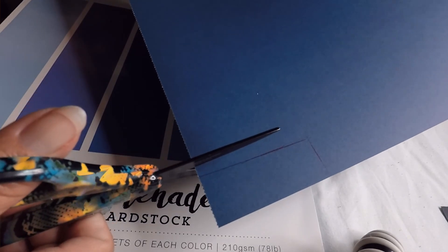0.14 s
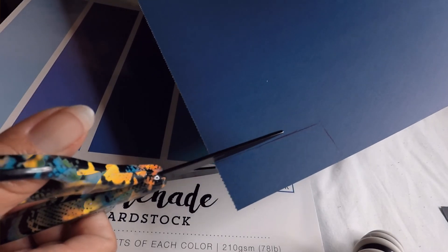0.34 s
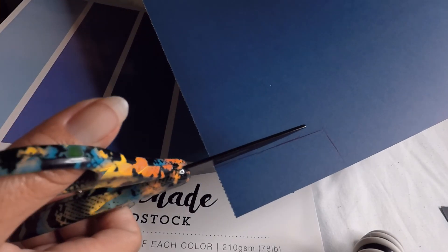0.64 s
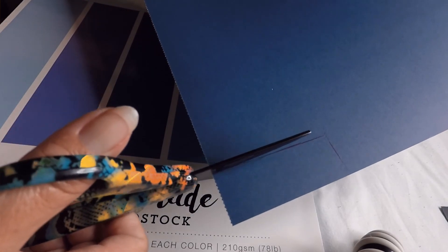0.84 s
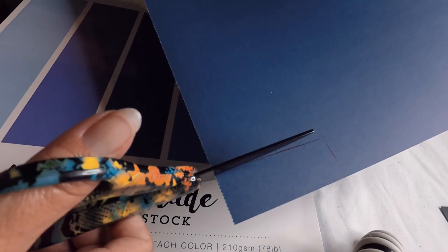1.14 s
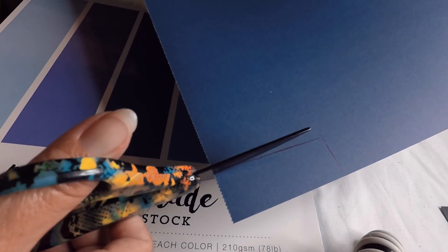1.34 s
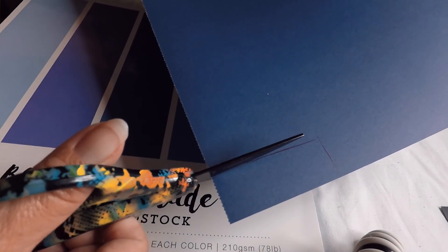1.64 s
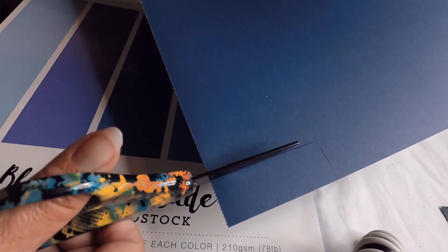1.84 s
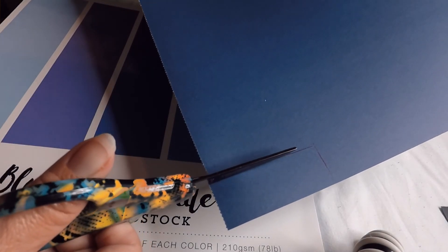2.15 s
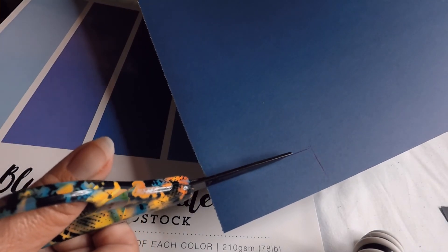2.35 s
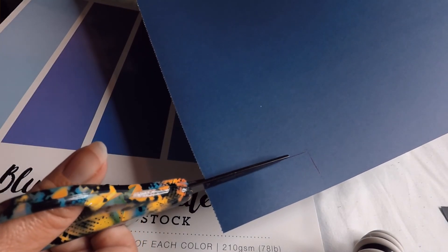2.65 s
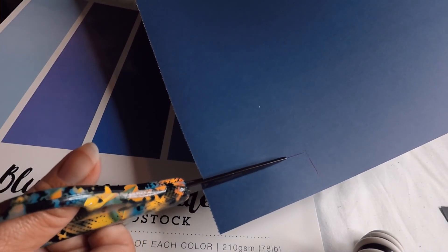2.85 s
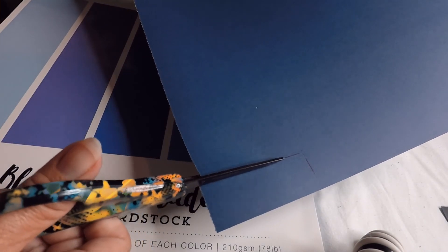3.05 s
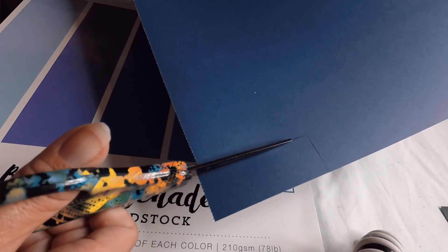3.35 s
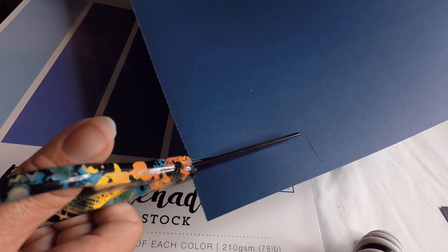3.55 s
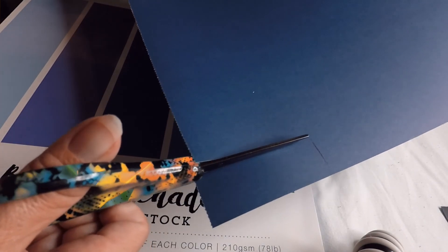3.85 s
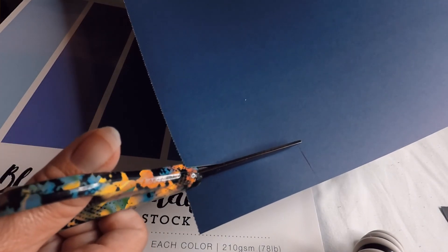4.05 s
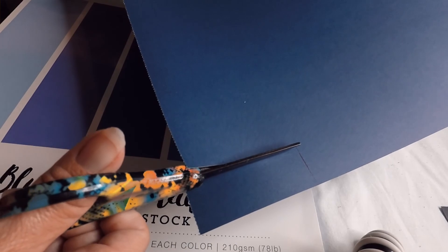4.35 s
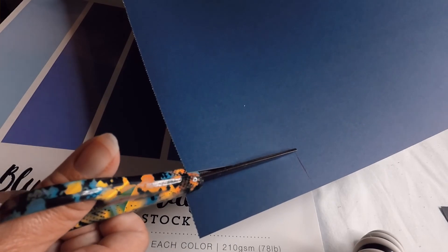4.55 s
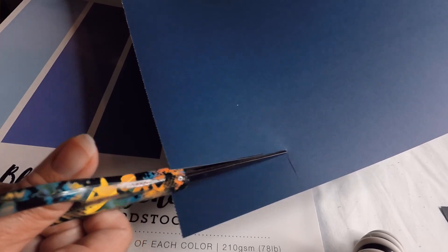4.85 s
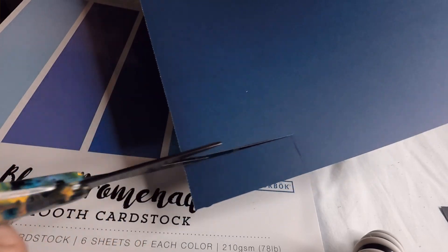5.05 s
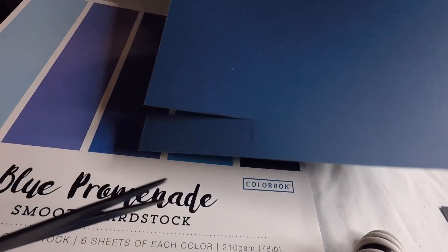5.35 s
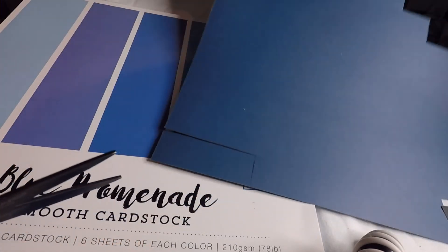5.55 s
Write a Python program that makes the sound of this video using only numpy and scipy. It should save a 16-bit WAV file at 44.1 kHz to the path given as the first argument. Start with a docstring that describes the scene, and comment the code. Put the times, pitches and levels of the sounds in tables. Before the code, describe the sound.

Scissors crunch slowly through thick card, snapping twice, before the blades pull out and the sheet slides across a table.

```python
"""At a table in a small room, scissors work slowly through thick card, close up.
Fibres give way in crackling slips that ring the sheet; two strokes end in a snap. In between, the
blades slide in the slit, scrape and knock the card; then they are drawn out and the sheet is pulled
across the table. The handled sheet bumps and rumbles over faint room hiss."""
import sys
import numpy as np
from scipy import signal
from scipy.fft import rfft, irfft
from scipy.io import wavfile

SR = 44100
rng = np.random.default_rng(int(sys.argv[2]) if len(sys.argv) > 2 else 0)


def log_audio(samples):
    """Write samples as a 16-bit WAV file to the path given in sys.argv[1]."""
    # one column per channel
    frames = np.atleast_2d(samples).T
    # limit to full scale, then quantise
    limited = np.clip(frames, -1, 1)
    pcm = np.round(limited * 32767).astype(np.int16)
    wavfile.write(sys.argv[1], SR, pcm)


N = 251525
TIME_S = np.arange(N) / SR

# big slips of the cut: (time [s], length [s], level [dB])
BIG_SLIPS = [(1.372, 0.011, -45.5), (1.431, .011, -40), (1.505, 0.011, -38.5), (1.725, 0.028, -40.5),
             (1.802, 0.021, -38), (1.983, 0.01, -40), (2.027, 0.022, -37.5), (2.258, 0.0052, -37.5),
             (2.38, 0.0048, -35), (2.422, 0.017, -36), (2.45, 0.0095, -33), (2.476, 0.0075, -33.5),
             (2.529, 0.0066, -37.5), (2.569, 0.0083, -36), (2.681, 0.0035, -34.5), (2.709, 0.013, -28.5),
             (2.765, 0.017, -35), (2.797, 0.0098, -27), (2.813, 0.025, -30.5), (2.95, 0.0037, -35),
             (2.958, 0.0057, -32), (3.098, 0.019, -33), (3.128, 0.005, -24), (3.322, 0.019, -28.5),
             (4.482, 0.0088, -32), (4.509, 0.0242, -29.5), (4.539, 0.013, -28), (4.571, 0.013, -24.5),
             (4.589, 0.011, -26.5), (4.611, 0.01, -32.5), (4.642, 0.0092, -27), (4.665, 0.012, -26),
             (4.687, 0.024, -28), (4.941, 0.014, -31.5)]
# hand squeezes: (time [s], length [s], first level [dB], last level [dB], slips [1/s], treble [dB])
SQUEEZES = [(1.368, 0.32, -46.5, -42, 42, -18.5), (1.726, 0.22, -37, -42.5, 45, -17.5),
            (2.007, 0.083, -39.5, -37.5, 50.6, -15.5), (2.11, .22, -47, -43.5, 30, -14),
            (2.415, 0.147, -40, -42, 36, -15.5), (2.685, 0.054, -51, -38, 39, -20.5),
            (2.777, 0.071, -35.5, -31, 70, -13.5), (3.086, .105, -35, -34, 60, -16.5),
            (3.26, .06, -45, -25.5, 49, -17.5), (4.492, 0.12, -29, -26, 50, -13),
            (4.676, 0.053, -28.5, -32, 45, -8.5)]
# sheet excited by the cut: (frequency [Hz], level [dB])
CARD_SPECTRUM = [(90, -14), (250, -14.5), (450, -12), (620, -2.5), (750, -2), (950, -8), (1250, -8.5),
                 (2000, -21.5), (3600, -31.5), (5000, -31), (8600, -37.5), (9600, -41), (15000, -45)]
# sheet under a sharp blow: (frequency [Hz], level [dB])
BLOW_SPECTRUM = [(100, -7), (280, 1), (500, 10), (750, 7.5), (1150, 4.5), (1800, -4), (2500, -2.5),
                 (3900, -17), (5000, -26), (7200, -23), (9500, -40), (15000, -53)]
# scratched steel: (frequency [Hz], level [dB])
STEEL_SPECTRUM = [(200, -3.5), (800, -1.5), (1500, 0), (2700, -10.5), (3300, -11.5), (4100, -15.5),
                  (4700, -10), (6000, -14), (9300, -17.5), (15000, -31)]
# blade resonances: (frequency [Hz], width [Hz], gain [dB])
BLADE_MODES = [(3330, 480, -4.5), (4150, 420, 8.5), (5080, 140, -2), (5660, 90, 5), (7130, 450, 1.5),
               (8320, 490, 4), (12060, 340, -3)]


def fibres(contact, time_s, treble_db, split_hz=2800, boom_hz=820, boom_db=-4):
    """Fibres break under the contact envelope: the sheet booms, the cut edge crackles on the blades."""
    # lift below and above the boom as the cut moves along the sheet: (time [s], gain [dB])
    flank_lift = [(1.4, -6.5), (2.0, -1), (2.45, 4), (3.3, 5.5), (4.5, 0.5), (4.7, 4.5)]
    lift_db = np.interp(time_s, *np.transpose(flank_lift))
    breaks = colour(contact * crackle(len(contact), rate_hz=9000, spread_db=3), CARD_SPECTRUM)
    breaks = colour(breaks, [(300, lift_db), (600, 0.016), (950, 0), (1300, lift_db)], size=1024)
    boom = amp(boom_db) * resonance(breaks, boom_hz, width_hz=290)
    body = unit(band(breaks + boom, split_hz, "low", order=4))
    crisp = unit(band(blades(breaks), split_hz, "high", order=4))
    return (body + amp(treble_db) * crisp) * np.sqrt(np.mean(contact ** 2))


def slip(length_s, build_s=0.0051):
    """Envelope of one slip: each break sets off its neighbours, so it builds up."""
    contact = stroke(max(length_s, .002), edge_s=0.00055)
    build = np.minimum(0.45 + np.arange(len(contact)) / (build_s * SR), 1)
    return unit_burst(contact * build, length_s)


def big_slips(gain_db=-0.5, crisp_db=-1.5):
    """The card gives way all at once; its crispness follows the surrounding squeezes."""
    out = np.zeros(N)
    start_s, span_s, *_, squeeze_treble_db = np.transpose(SQUEEZES)
    for time_s, length_s, db in BIG_SLIPS:
        treble_db = np.interp(time_s, start_s + span_s / 2, squeeze_treble_db) + crisp_db
        add(out, time_s, amp(db + gain_db) * fibres(slip(length_s), time_s, treble_db))
    return out


def small_slips(slip_s=0.00916, rest_s=0.005, gap_scatter=0.304, scatter_db=2, max_slips=32):
    """Each squeeze sticks and slips at an uneven rate, pausing around a big slip."""
    out = np.zeros(N)
    for time_s, length_s, first_db, last_db, rate_hz, treble_db in SQUEEZES:
        gap_draws, size_draws = rng.standard_normal((max_slips, 2)).T
        gaps_s = np.exp(gap_scatter * gap_draws) / rate_hz
        contact = np.zeros(SR // 2)
        for at_s, size in zip(np.cumsum(gaps_s) - gaps_s[0], size_draws):
            paused = any(big_s - slip_s - rest_s < time_s + at_s < big_s + span_s + rest_s
                         for big_s, span_s, _ in BIG_SLIPS)
            if at_s < length_s - slip_s and not paused:
                db = first_db + (last_db - first_db) * at_s / length_s + scatter_db * size
                add(contact, at_s, amp(db) * slip(slip_s))
        add(out, time_s, fibres(contact, time_s, treble_db))
    return out


def creeping(gain_db=-8, uneven_db=2, edge_s=0.016):
    """The edge tears on in uneven steps, as hard as the hand squeezes."""
    pressure = np.zeros(N)
    for time_s, length_s, first_db, last_db, _, _ in SQUEEZES:
        outside_s = np.maximum(np.abs(TIME_S - time_s - length_s / 2) - length_s / 2, 0)
        db = np.interp(TIME_S, [time_s, time_s + length_s], [first_db, last_db])
        pressure += amp(db) * np.exp(-outside_s / edge_s)
    tearing = blades(colour(crackle(N, rate_hz=3000, spread_db=5), CARD_SPECTRUM))
    return pressure * amp(gain_db + uneven_db * wander(rate_hz=90)) * unit(tearing)


def blades(x):
    """Whatever scratches the steel also rings it."""
    return resonate(x, BLADE_MODES)


def snapping(crack_db=-13):
    """The last fibres crack, the blades jump shut and the released sheet rings on."""
    # breaks that end a stroke: (time [s], length [s], level [dB], ring [dB], t60 stretch [ratio])
    snaps = [(3.317, 0.0031, -22.5, 1.5, 1), (4.707, 0.00347, -12.5, -3.5, 0.47)]
    # modes of sheet and blades: (frequency [Hz], level [dB], t60 [s])
    modes = [(300, -10, 0.077), (420, 1, 0.15), (662, -4.5, 0.13), (740, -8, 0.23), (1053, -2.5, 0.11),
             (1250, -20, 0.023), (1580, 1, 0.063), (1940, -6, 0.025), (2220, 1, 0.026), (2520, 7.5, 0.034),
             (2900, -1, 0.033), (3180, -7.5, 0.032), (3830, -2, 0.042)]
    out, t = np.zeros(N), np.arange(SR // 3) / SR
    for time_s, length_s, db, ring_db, stretch in snaps:
        contact = stroke(length_s, edge_s=0.00032)
        crack = colour(contact * crackle(len(contact), rate_hz=12000, spread_db=5), STEEL_SPECTRUM)
        crack = band(blades(crack), 6300, "low")
        blow = colour(contact * crackle(len(contact), rate_hz=12000, spread_db=5), BLOW_SPECTRUM)
        ring = sum((-1) ** k * amp(mode_db - 60 * t / (t60_s * stretch)) * np.sin(2 * np.pi * hz * t)
                   for k, (hz, mode_db, t60_s) in enumerate(modes))
        add(out, time_s - length_s / 4, amp(db + crack_db) * unit_burst(crack, length_s))
        add(out, time_s, amp(db) * unit_burst(blow, length_s))
        add(out, time_s + length_s / 2, amp(db + ring_db) * unit_burst(ring, length_s))
    return out


def knocking(t60_s=0.014, rise_s=0.00038, flutter_db=-20, flutter_t60_s=0.03):
    """One push swings the card for a few cycles, with a click on top and a faint flutter after."""
    # blade knocks and last-fibre pops: (time [s], level [dB], pitch [Hz], click [dB])
    knocks = [(2.0775, -25.5, 810, -13), (2.179, -26, 745, -23), (2.8025, -14, 700, -12),
              (3.024, -27, 790, -0.5), (3.056, -26.5, 774, -22), (3.1325, -28, 730, -10),
              (3.385, -29, 655, -14), (3.743, -31, 660, -3), (3.833, -29.5, 665, -1.5),
              (3.921, -18, 680, -36), (3.9805, -18, 620, -0.5), (4.037, -17, 630, -21),
              (4.400, -37, 680, 6.5), (4.958, -16, 790, -17), (5.085, -28.5, 1110, -12)]
    out, t = np.zeros(N), np.arange(SR // 8) / SR
    click = colour(1. * (t == 0), BLOW_SPECTRUM)
    click /= np.abs(click).max()
    for time_s, db, hz, click_db in knocks:
        swing = np.sin(2 * np.pi * hz * t) * amp(-60 * t / t60_s) * (1 - np.exp(-t / rise_s))
        flutter = unit(colour(rng.standard_normal(len(t)), CARD_SPECTRUM))
        flutter *= amp(flutter_db - 60 * t / flutter_t60_s)
        add(out, time_s, amp(db) * (1.28 * swing + flutter + amp(click_db) * click))
    return out


def sliding(rub_db=-1, ring_db=0.5, ring_hz=3890, width_hz=500, waver_hz=60, uneven_db=2.8):
    """The flat of the blade rubs the cut edge; friction sings in one broad, wavering resonance."""
    # moves in the slit: (time of top speed [s], rise [s], fall [s], rub [dB], ring [dB])
    slides = [(.028, 0.036, 0.018, -44, -53.5), (3.549, 0.16, 0.15, -43.5, -53),
              (3.714, 0.081, 0.045, -37, -45.5), (3.83, 0.065, .11, -46, -49), (4.023, .07, 0.03, -42, -47)]
    # rubbed cut edge: (frequency [Hz], level [dB])
    slit_spectrum = [(120, -3.5), (300, -7), (520, 0), (730, 2.5), (1000, -2), (1300, -4), (2400, -12),
                     (4800, -19), (8000, -22), (10000, -27.5), (15000, -43)]
    rub = unit(colour(crackle(N, rate_hz=4800, spread_db=4.5), slit_spectrum))
    cycles = np.cumsum(ring_hz + waver_hz * wander(rate_hz=40)) / SR
    ring = unit(band(rng.standard_normal(N), width_hz / 2, "low") * np.sin(2 * np.pi * cycles))
    rub_gain = power_sum(amp(db + rub_db) * hand_move(*timing) for *timing, db, _ in slides)
    ring_gain = power_sum(amp(db + ring_db) * hand_move(*timing) for *timing, _, db in slides)
    return (rub_gain * rub + ring_gain * ring) * amp(uneven_db * wander(rate_hz=70))


def scraping():
    """Brief bright rasps as the blades shift; a free blade pings in its lowest mode."""
    # steel on steel and on card: (time [s], length [s], level [dB], ping [dB])
    scrapes = [(0.245, 0.018, -57, -22), (1.126, .014, -49, -6), (1.172, 0.012, -49.5, 0),
               (3.251, 0.026, -46, -20), (3.301, 0.025, -37, -12), (4.232, 0.01, -47, -13),
               (4.373, 0.0079, -46, -30), (4.911, 0.011, -41.5, -16), (4.944, 0.0099, -35, -21),
               (5.087, 0.017, -42, -8), (5.137, 0.011, -50, -8), (5.174, 0.018, -46.5, -8),
               (5.343, 0.0086, -51, 6.5), (5.639, 0.012, -41.5, -7)]
    out = np.zeros(N)
    for time_s, length_s, db, ping_db in scrapes:
        contact = stroke(length_s, edge_s=0.0033)
        grit = contact * crackle(len(contact), rate_hz=7000, spread_db=4)
        rasp = blades(colour(grit, STEEL_SPECTRUM))
        ping = unit_burst(resonance(rasp, BLADE_MODES[0][0], width_hz=120), length_s)
        add(out, time_s, amp(db) * (unit_burst(rasp, length_s) + amp(ping_db) * ping))
    return out


def dragging(gain_db=-1, split_hz=5000, uneven_db=2, sing_db=-6, clear_s=5.13, fade_s=0.017):
    """Card grain rubs over blade and table; the blade sings until it is clear of the slit."""
    # pulls on scissors and sheet: (time of top speed [s], rise [s], fall [s], level [dB], treble [dB])
    pulls = [(4.952, 0.041, 0.033, -34.5, -6.5), (4.99, 0.099, 0.1, -37, -8.5),
             (5.093, 0.035, .035, -39.5, -2.5), (5.235, 0.071, 0.037, -47, -8),
             (5.29, 0.032, 0.07, -43, -6), (5.355, 0.098, 0.12, -47.5, 0.5), (5.61, 0.22, 0.089, -48, -0.5),
             (5.7, 0.024, 0.033, -51, -11)]
    # dragged sheet: (frequency [Hz], level [dB])
    sheet_spectrum = [(90, 6.5), (270, -2), (380, 4.5), (750, 6.5), (950, 2.5), (1400, 3), (1900, -1),
                      (2700, -2), (3150, -2), (3900, -11.5), (5100, -20.5), (7800, -23.5), (9800, -32),
                      (15000, -35.5)]
    grain = colour(crackle(N, rate_hz=5000, spread_db=1), sheet_spectrum)
    body, hiss = (unit(band(grain, split_hz, kind, order=4)) for kind in ("low", "high"))
    sing = unit(resonance(crackle(N, rate_hz=3900, spread_db=4), hz=3950, width_hz=340))
    in_slit = np.clip((clear_s - TIME_S) / fade_s, 0, 1)
    body += amp(sing_db) * sing * in_slit
    body_gain = power_sum(amp(db) * hand_move(*timing) for *timing, db, _ in pulls)
    hiss_gain = power_sum(amp(db + treble_db) * hand_move(*timing) for *timing, db, treble_db in pulls)
    return (body_gain * body + hiss_gain * hiss) * amp(gain_db + uneven_db * wander(rate_hz=80))


def bumping(edge_ratio=1.31, pivot_hz=125, rise_s=0.0041):
    """The sheet flexes or touches down: hollow bumps in its broad, low modes."""
    # bumps: (time [s], level [dB], tilt [dB/octave])
    bumps = [(.048, -44, -5), (2.18, -41, -2), (2.715, -41, -0.5), (2.801, -42, -3), (3.327, -23.5, -2.5),
             (3.83, -38.5, 3), (4.029, -40, -8), (4.958, -37.5, -1), (5.175, -42, 4.5), (5.281, -42, 7),
             (5.523, -38, 5), (5.688, -45, 9)]
    # modes of the loose sheet: (frequency [Hz], level [dB], t60 [s])
    flex_modes = [(32.7, -0.5, 0.15), (126, -11.5, 0.26), (229, -9.5, 0.14), (302, -10, 0.11)]
    out, t = np.zeros(N), np.arange(SR // 3) / SR
    for time_s, db, tilt_db in bumps:
        for hz, mode_db, t60_s in flex_modes:
            noise = band(rng.standard_normal(SR // 2), [hz / edge_ratio, hz * edge_ratio], "band")
            envelope = amp(-60 * t / t60_s) * (1 - np.exp(-t / rise_s))
            flex = unit_burst(noise[-len(t):] * envelope, t60_s / 8)
            add(out, time_s, amp(db + mode_db + tilt_db * np.log2(hz / pivot_hz)) * flex)
    return out


def humming(x):
    """The held sheet and the table under it hum along."""
    # their resonances: (frequency [Hz], width [Hz], gain [dB])
    hum_modes = [(134, 3, 9.5), (777, 46, -17)]
    return resonate(x, hum_modes)


def handling(gain_db=6.5, uneven_db=2, low_hz=11.1, top_hz=130):
    """Rumble from the slow wobble of the held sheet."""
    # rumble contour: (time [s], level [dB])
    contour = [(0, -43.5), (.7, -47.5), (1.7, -37), (2.45, -47), (3.9, -34), (4.3, -42), (5.3, -39.5),
               (5.7, -32)]
    # wobbling sheet: (frequency [Hz], level [dB])
    spectrum = [(8, 13.5), (20, 3), (35, -4.5), (55, -19), (90, -19), (135, -28), (200, -27)]
    rumble = unit(colour(band(rng.standard_normal(N), low_hz, "high"), spectrum))
    db = np.interp(TIME_S, *np.transpose(contour)) + gain_db + uneven_db * wander(rate_hz=14)
    return band(rumble, top_hz, "low") * amp(db)


def room(x, table_db=-10.5, walls_db=-15, dull_hz=2400):
    """Quick reflections from the table and a short, dull answer from the walls."""
    echoes = amp(table_db) * reflections(x, t60_s=0.099) + amp(walls_db) * reflections(x, t60_s=0.24)
    return x + band(echoes, dull_hz, "low", order=1)


def reflections(x, t60_s, delay_s=0.002):
    """Dense echoes of x, dying away."""
    t = np.arange(16384) / SR
    response = rng.standard_normal(len(t)) * amp(-60 * t / t60_s) * (t > delay_s)
    return signal.fftconvolve(x, response / np.sqrt(np.sum(response ** 2)))[:N]


def air(level_db=-56):
    """Faint, steady room hiss."""
    # (frequency [Hz], level [dB])
    spectrum = [(60, -16), (125, -2.5), (200, -6.5), (330, -8), (600, -12.5), (1200, -17),
                (2300, -19.5), (6000, -24.5), (15000, -27)]
    return amp(level_db) * unit(colour(rng.standard_normal(N), spectrum))


def crackle(count, rate_hz, spread_db):
    """Tiny random breaks of scattered size."""
    chance, size, sign = rng.random(count), rng.standard_normal(count), rng.choice([-1, 1], count)
    return (chance < rate_hz / SR) * amp(spread_db * size) * sign


def stroke(length_s, edge_s):
    """Envelope of a contact held and let go."""
    t = np.arange(SR // 10) / SR
    return np.minimum(t / edge_s, 1) * np.exp(-np.maximum(t - length_s + edge_s, 0) / edge_s)


def hand_move(peak_s, rise_s, fall_s, exponent=1.37):
    """Rubbing gain, a power of hand speed: the hand speeds up, peaks and comes to rest."""
    speed = np.sin(np.interp(TIME_S, [peak_s - rise_s, peak_s, peak_s + fall_s], [0, np.pi / 2, np.pi]))
    return np.abs(speed) ** exponent


def power_sum(gains):
    """Overlapping rubs add in power."""
    return np.sqrt(sum(gain ** 2 for gain in gains))


def wander(rate_hz):
    """Continuous random curve of rms 1."""
    return unit(np.interp(TIME_S * rate_hz, np.arange(2000), rng.standard_normal(2000)))


def resonance(x, hz, width_hz):
    """One damped mode, gain 1 at its centre."""
    return signal.lfilter(*signal.iirpeak(hz, hz / width_hz, fs=SR), x)


def resonate(x, modes):
    """x plus the modes it rings."""
    return x + sum(amp(db) * resonance(x, hz, width_hz) for hz, width_hz, db in modes)


def colour(x, spectrum, size=8192):
    """Minimum-phase filter through (frequency [Hz], gain [dB]) points."""
    hz, db = np.transpose(spectrum)
    grid_hz = np.maximum(np.arange(size // 2 + 1) * SR / size, 1)
    gain = amp(np.interp(np.log(grid_hz), np.log(hz), db))
    cepstrum = irfft(np.log(gain))
    cepstrum[1:size // 2] *= 2
    cepstrum[size // 2 + 1:] = 0
    return signal.fftconvolve(x, irfft(np.exp(rfft(cepstrum))))[:len(x)]


def band(x, hz, kind, order=2):
    """Butterworth filter."""
    return signal.sosfilt(signal.butter(order, hz, kind, fs=SR, output="sos"), x)


def amp(db):
    """Decibels to gain."""
    return 10 ** (np.asarray(db) / 20)


def unit(x):
    """Scale to rms 1."""
    return x / np.sqrt(np.mean(x ** 2) + 1e-20)


def unit_burst(x, length_s):
    """Scale to the energy of rms 1 over length_s."""
    return x / np.sqrt(np.sum(x ** 2) / (length_s * SR) + 1e-20)


def add(out, time_s, x):
    """Mix x into out from time_s."""
    start = max(int(time_s * SR), 0)
    out[start:start + len(x)] += x[:max(len(out) - start, 0)]


def scene():
    """The work at the table over the room hiss, mono."""
    cutting = big_slips() + small_slips() + creeping()
    work = humming(cutting + snapping() + knocking() + sliding() + scraping() + dragging())
    return (air() + room(work) + handling() + bumping())[None]


def record(dry, top_hz=15350):
    """Steep low-pass on the top treble."""
    return signal.sosfilt(signal.ellip(10, .2, 80, top_hz, fs=SR, output="sos"), dry)


dry = scene()
out = record(dry)
log_audio(out)
```